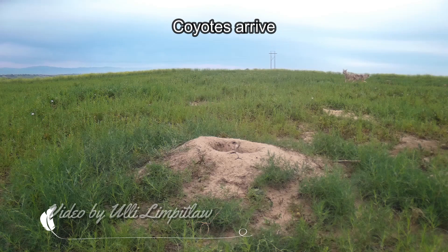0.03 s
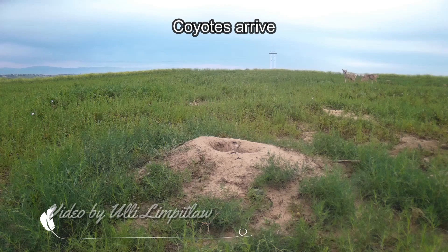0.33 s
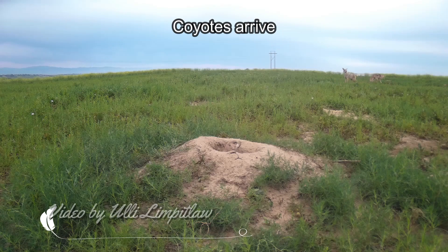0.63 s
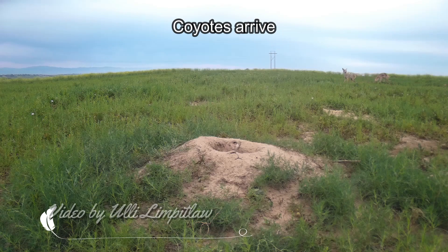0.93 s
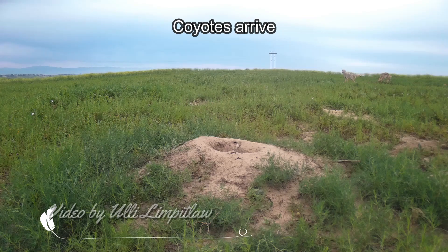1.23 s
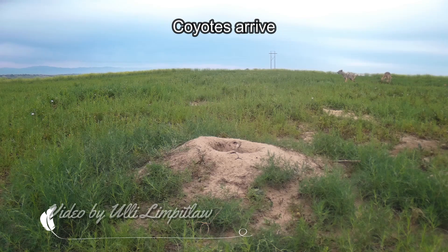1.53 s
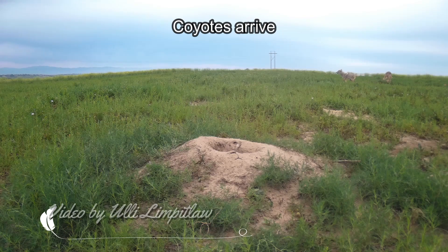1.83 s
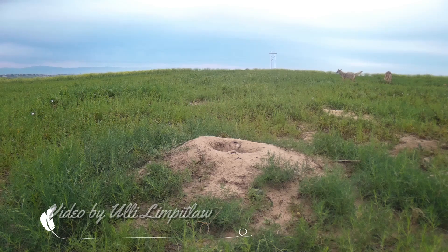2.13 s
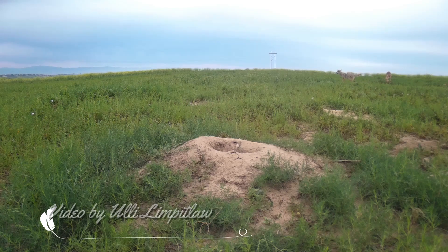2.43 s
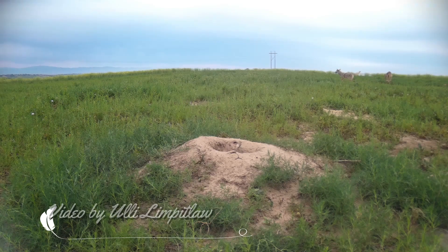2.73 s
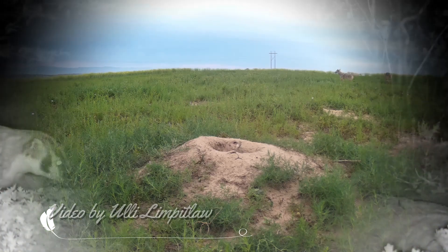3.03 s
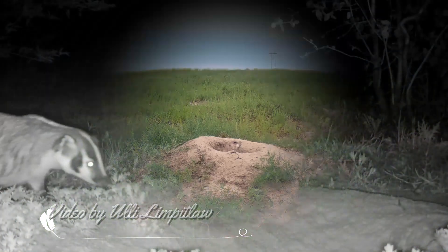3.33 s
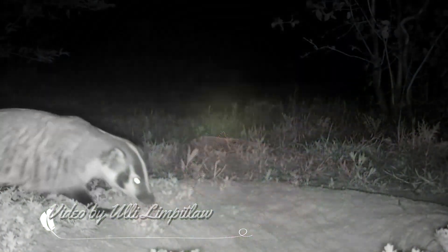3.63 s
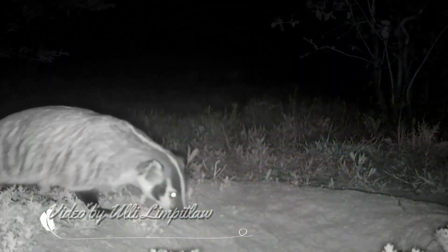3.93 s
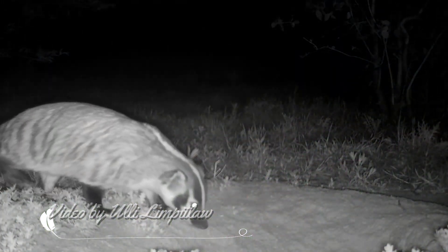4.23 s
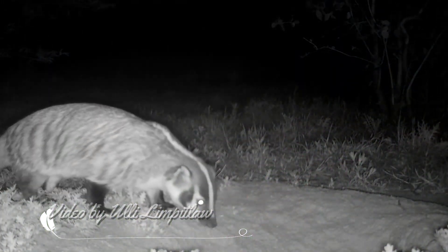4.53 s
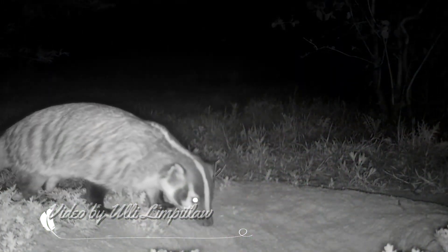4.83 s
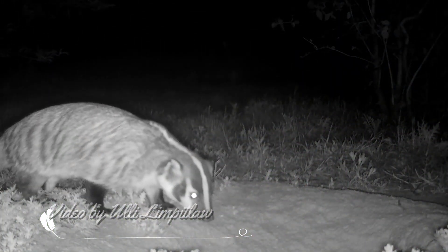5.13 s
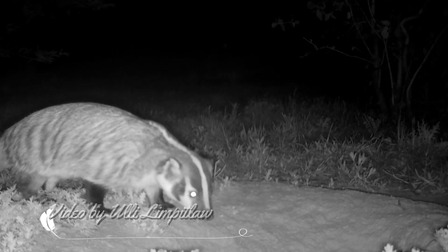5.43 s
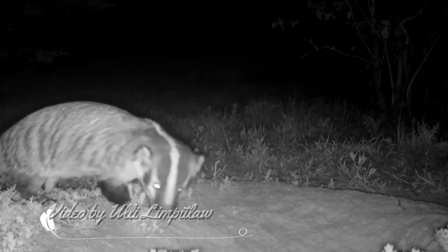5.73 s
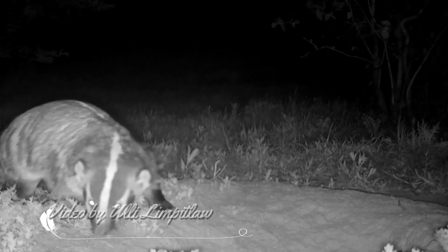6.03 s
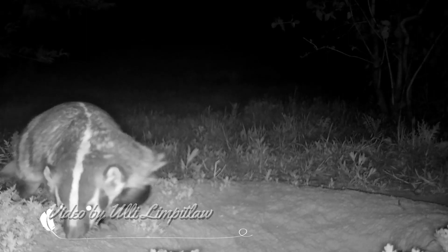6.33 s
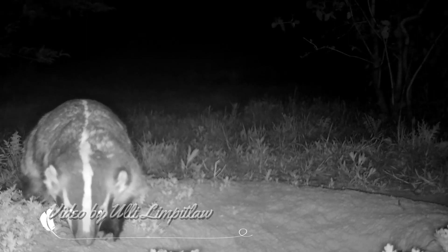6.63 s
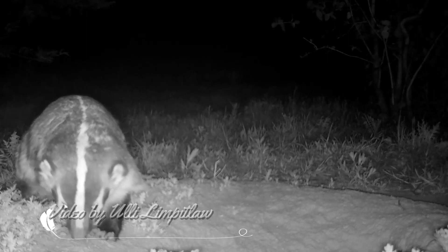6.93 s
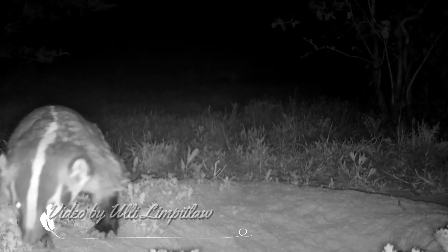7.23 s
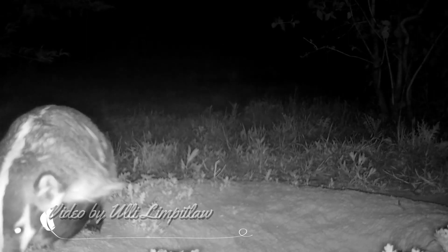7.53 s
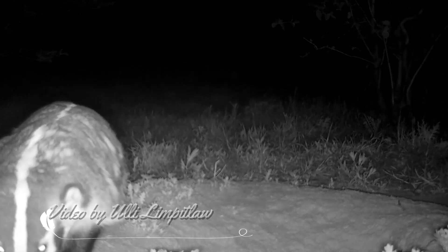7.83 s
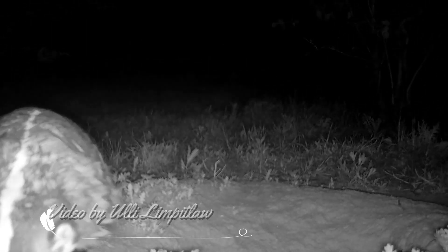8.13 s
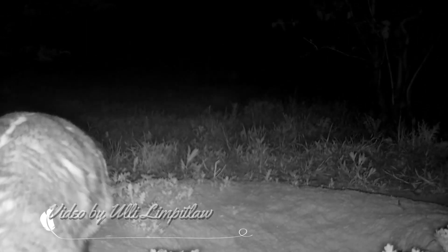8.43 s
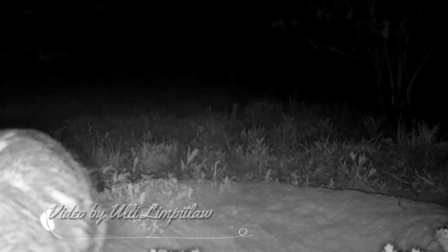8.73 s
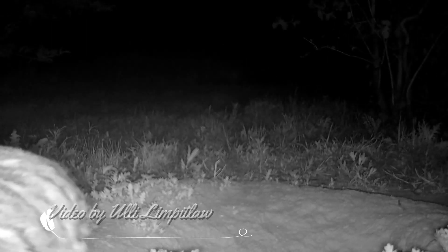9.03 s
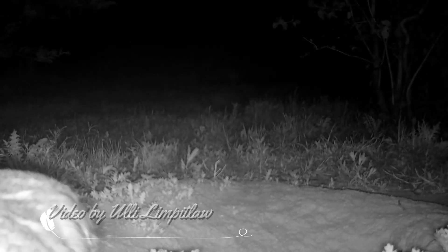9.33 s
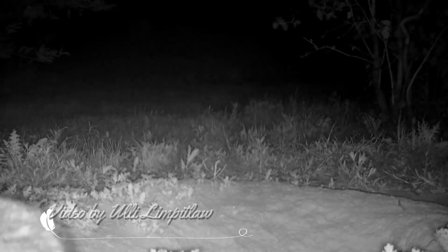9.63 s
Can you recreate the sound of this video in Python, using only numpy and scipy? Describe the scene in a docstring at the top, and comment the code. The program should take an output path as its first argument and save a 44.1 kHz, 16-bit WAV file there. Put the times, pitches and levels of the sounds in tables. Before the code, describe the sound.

Sharp, raspy prairie dog yips and wind stop abruptly, giving way to a click and quiet hiss with faint badger steps and sniffs.

```python
"""A prairie dog barks close by: strained vocal folds drive the resonances of its throat and mouth.
A faint falling wheeze follows each bark, others answer far off, and wind rumbles on the microphone.
The day stops dead and a night scene follows: a click rings the housing of a small camera, whose hiss
fades in. Near it a badger treads and snuffles, heard as short swells of filtered noise."""
import sys
import numpy as np
from scipy import signal
from scipy.fft import rfft, irfft, next_fast_len
from scipy.io import wavfile

SR = 44100
rng = np.random.default_rng(int(sys.argv[2]) if len(sys.argv) > 2 else 0)


def dump_mix(stems):
    """Bounce the given channels to the path in sys.argv[1] as a 16-bit WAV at rate SR."""
    frames = np.atleast_2d(stems).T  # one column per channel
    limited = np.clip(frames, -1, 1)  # hard clip at full scale
    pcm = np.round(limited * 32767).astype(np.int16)
    wavfile.write(sys.argv[1], SR, pcm)


N = 426447
TIME = np.arange(N) / SR
DAY_END_S, NIGHT_START_S, CLICK_S = 3.137, 3.153, 3.186


def barks(home_hz=1506.1, flutter_hz=335, growl_db=-4, catch_db=-24):
    """Source and filter: the throat shapes arched yips, which rasp where the folds vibrate irregularly."""
    # calls: t/s, length/s, opening pitch f/Hz, share of the length at which the voice drops, level/dB
    calls = [(0.239, 0.065, 1614, .77, -25.5), (0.5773, 0.061, 1694, 0.84, -24.5),
             (0.9733, 0.056, 1618, 0.79, -25), (1.3475, 0.054, 1572, 0.75, -27),
             (1.777, 0.056, 1453, 0.76, -27.5), (2.149, 0.052, 1457, .63, -29),
             (2.531, 0.056, 1418, 0.74, -29), (2.9015, 0.056, 1440, 0.75, -27.5)]
    # course of one bark: share of length, share of pitch, level/dB, strain (0-1)
    contour = [(0, .79, -8.5, 0), (.065, .92, -4, 0.09), (.16, .99, 1, 0.11), (.245, 1, 1, .95),
               (.52, 1.01, -1, 0.74), (.75, .98, 2.5, 0.64), (.84, .84, -5, 0.48), (1, .72, -11, .3)]
    # response of throat and mouth: f/Hz, level/dB
    throat = [(300, -24), (1000, -12.5), (1550, -4.5), (2000, -6), (2600, -0.5), (3300, -4), (3700, -8),
              (4120, -23), (4800, -15.5), (5500, -25.5), (6400, -10), (7100, -30), (8300, -38), (9100, -47),
              (9900, -43.5), (11000, -51), (13000, -56)]
    out = np.zeros(N)
    for start, length, opening_hz, drop_at, db in calls:
        u = course(length)
        # a higher bark breaks sooner, but is less rough and brighter
        octaves_up = np.log2(opening_hz / home_hz)
        break_at = np.clip(.22 - .46 * octaves_up, 0, .5)
        stage = np.interp(u, [0, break_at, drop_at, 1], [0, .2, .75, 1])
        arch, contour_db, strain = follow(contour, stage)
        rough = (1.083 - 2.1 * octaves_up) * strain
        # under strain the pitch lurches slowly and flutters fast
        shake = .033 * wobble(len(u), 84.4, 40) + .1 * wobble(len(u), flutter_hz, 140)
        hz = (opening_hz + (home_hz - opening_hz) * u) * arch * (1 + rough * shake)
        # the folds beat against each other and alternate strong and weak cycles
        beat = rough * (.44 * wobble(len(u), 230.3, 100) + .37 * wobble(len(u), 820, 151.7))
        breath = .232 * (rough + .12) * rng.standard_normal(len(u))
        growl = undb(growl_db) * rough * wobble(len(u), 358, 390)  # uneven airflow
        source = (1 + beat) * folds(hz, count=8) + breath + growl
        voice = colour(source * fade(len(u), .00047, .0018), throat, tilt_db=3 + 5 * octaves_up)
        add(out, start, voice * undb(db + contour_db))
        # a tiny catch as the throat closes
        catch = colour(rng.standard_normal(int(.005 * SR)), throat)
        add(out, start + length + .0036, catch * np.hanning(len(catch)) * undb(db + catch_db))
    return out


def wheezes(level_db=-41.5, sink=.28, settle=1.645, rasp_s=.028, rasp_db=-6):
    """Voicing between barks: a short rasp, then a sinking tone that clears and dulls as it decays."""
    # breaths: t/s, length/s, first pitch f/Hz
    breaths = [(0.074, 0.041, 690), (0.387, 0.061, 710), (0.728, 0.1125, 806), (1.125, 0.12, 936),
               (1.489, 0.13, 850), (1.921, 0.096, 942), (2.289, .137, 874), (2.669, 0.13, 861),
               (3.033, 0.16, 971)]
    # response of the wheezing throat: f/Hz, level/dB
    throat = [(350, 3.5), (650, 0.5), (900, -5), (1250, -9), (1650, -11), (2000, -15.5), (2550, -6),
              (3000, -28), (5000, -49), (9000, -34)]
    out = np.zeros(N)
    for start, length, first_hz in breaths:
        u = course(length)
        jitter = (.016 + .057 * np.exp(-u / .063)) * wobble(len(u), 100, 180)
        waver = .011 * wobble(len(u), 36, 20)
        glide = np.expm1(-settle * u ** .8) / np.expm1(-settle)  # 0 to 1, fastest at first
        hz = first_hz * (1 - sink * glide) * (1 + jitter + waver)
        source = folds(hz, count=10, slope_db=-9 * u ** 2) + .7 * rng.standard_normal(len(u))
        tone = colour(source, throat) * fade(len(u), .0069, .012)
        add(out, start, tone * undb(level_db - 4 * u ** 2))
        # the rasp starts higher and just overlaps the tone
        u = course(rasp_s)
        hz = first_hz * (1.3 - .303 * u) * (1 + .11 * wobble(len(u), 145, 128))
        source = folds(hz, count=6) + .13 * rng.standard_normal(len(u))
        rasp = colour(source, throat, tilt_db=1) * fade(len(u), .0025, .0031)
        add(out, start - rasp_s + .00304, rasp * undb(level_db + rasp_db))
    return out


def squeaks(first_hz=2600, last_hz=2150, jitter=.057):
    """Flow-driven tone: air whistles through the narrowed throat, gliding down before some wheezes."""
    # whistles: t/s, length/s, level/dB
    whistles = [(0.688, 0.0071, -48), (1.432, 0.032, -50.5), (2.228, 0.032, -55), (2.613, .018, -56),
                (2.985, 0.02, -50.5)]
    out = np.zeros(N)
    for start, length, db in whistles:
        u = course(length)
        hz = (first_hz + (last_hz - first_hz) * u) * (1 + jitter * wobble(len(u), 202, 200))
        add(out, start, folds(hz, count=1) * fade(len(u), .0031, .006) * undb(db))
    return out


def answers(middle_hz=2060, middle_s=.074, level_db=-61, colony_per_s=4, colony_db=-10.5):
    """Source and filter at a distance: thin arched barks, filtered to favour the second harmonic."""
    # neighbours' barks: t/s, top pitch f/Hz
    neighbours = [(0.041, 1952), (0.353, 2180), (0.783, 2170), (1.173, 1786), (1.242, 2145), (1.674, 2080),
                  (1.74, 1746), (1.976, 2040), (2.329, 1870), (2.594, 2126)]
    # course of a distant bark: share of length, share of top pitch, level/dB
    contour = [(0, .88, -5), (.18, 1.01, 9.5), (.4, .93, 4.5), (.65, .88, 5), (1, 0.65, 1)]
    # spectral envelope of a distant bark: f/Hz, level/dB
    spectrum = [(1400, -18.5), (2100, -5), (3300, 3), (4300, -6.5), (5200, -16), (6600, -9), (8000, -19),
                (11000, -33.5)]
    calls = [(start, hz, 0) for start, hz in neighbours]
    # the colony beyond them calls at random, within 0.2 octave of the middle pitch
    for when, height in rng.random((int(colony_per_s * DAY_END_S), 2)):
        calls.append((when * DAY_END_S, middle_hz * 2 ** (.2 * (2 * height - 1)), colony_db))
    out = np.zeros(N)
    for start, top_hz, distance_db in calls:
        effort = top_hz / middle_hz  # more effort: higher, longer and louder
        u = course(middle_s * effort ** 1.6)
        db = level_db + 10.5 * np.log2(effort) + distance_db
        arch, contour_db = follow(contour, u)
        shake = .026 * wobble(len(u), 31.5, 20.5) + .007 * wobble(len(u), 300, 199)
        voice = colour(folds(top_hz * arch * (1 + shake), count=4), spectrum)
        add(out, start, voice * fade(len(u), .0032, .015) * undb(db + contour_db))
    return out


def badger(tread_s=.038, sniff_gap_s=.156, sniff_spread_db=1.1):
    """Impact, turbulence and fracture: paws thud, the nose sniffs in even bouts, a dry stalk snaps."""
    # footfalls: t/s, level/dB
    footfalls = [(4.125, -63), (4.165, -53), (4.42, -62), (4.575, -66), (4.71, -65), (5.752, -59),
                 (7.35, -66), (7.66, -65), (7.87, -68.5)]
    # bouts of sniffing: first t/s, last t/s, length of a sniff/s, level/dB
    bouts = [(3.64, 3.77, .06, -69.5), (7.07, 7.2, 0.17, -65), (7.727, 7.727, .05, -65),
             (8.575, 8.575, .07, -64), (8.66, 9.125, 0.078, -61), (9.29, 9.595, 0.1, -65)]
    # spectra of nose, paw and stalk: f/Hz, level/dB
    nose = [(1000, -6), (2400, 3.5), (2900, -5), (3400, 7.5), (4000, -3), (4700, -17), (6300, -24),
            (9000, -35)]
    paw = [(30, -10.5), (80, 5), (160, 4), (300, -17), (700, -22), (3000, -61.5)]
    stalk = [(1000, 0), (3500, 2), (6000, -12), (9000, -30)]
    treads = puffs([(t, tread_s, db) for t, db in footfalls], paw, grain_db=5.5)
    sniffs = []
    for first, last, length, db in bouts:
        for t in np.linspace(first, last, 1 + round((last - first) / sniff_gap_s)):
            sniffs.append((t, length, db + sniff_spread_db * rng.standard_normal()))
    snap = puffs([(9.4915, .005, -57)], stalk, grain_db=.5)
    return treads + puffs(sniffs, nose, grain_db=2.5) + snap


def click(contact_s=.0011):
    """Modal ringing: a sharp tick excites the damped resonances of the camera's housing."""
    # modes of the housing: f/Hz, level/dB, t60/s
    modes = [(1560, -31.5, 0.017), (1710, -43, 0.09), (1800, -31, 0.024), (2500, -34.5, 0.022),
             (3100, -29, 0.0171), (3580, -23, 0.017), (3730, -25, 0.012), (3880, -40, .012),
             (5680, -60, .012), (6400, -55, .012)]
    t = np.arange(SR // 8) / SR
    ring = sum(undb(db - 60 * t / t60) * np.sin(2 * np.pi * hz * t) for hz, db, t60 in modes)
    return scatter(ring * fade(len(t), contact_s, .01), wet_db=-19, t60=.057)


def wind(level_db=-29.5, eddy_db=-21, air_db=-55):
    """Turbulence: wind rumbles on the microphone and small eddies flutter, over smooth grassland hiss."""
    # spectra of the rumble, the open air and the eddies: f/Hz, level/dB
    rumble_spectrum = [(16, -1.5), (29, 2), (40, -3), (60, -6), (82, -3), (110, -10), (145, -14.5),
                       (180, -20), (240, -25.5), (330, -34.5), (500, -37.5), (1200, -62), (5000, -100)]
    air_spectrum = [(200, -9), (500, -1), (1100, -2), (1700, -10), (3000, -14), (8000, -17), (14000, -16.5),
                    (16000, -20.5)]
    eddy_spectrum = [(110, -2), (170, -4), (350, -7.5), (600, -32), (2000, -51.5)]
    rumble = noise(rumble_spectrum) * undb(wobble(N, 7.3, 6.6))
    eddies = noise(eddy_spectrum) * undb(eddy_db + 4 * wobble(N, 6.6, 8))
    return (rumble + eddies) * undb(level_db) + noise(air_spectrum) * undb(air_db)


def night_hiss(level_db=-58, full_s=4.12, rise_db_per_s=6.5, whine_hz=7800, whine_db=-92.5):
    """Noise floor: the camera's dull hiss fades in, with a low rumble and a thin electronic whine."""
    # spectra of the hiss and the rumble: f/Hz, level/dB
    hiss_spectrum = [(30, -20.5), (90, -10), (190, -8.5), (270, -5.5), (420, -5.5), (950, -3), (1400, -4.5),
                     (2000, -9), (3000, -15), (3900, -19.5), (4800, -30), (6500, -38.5), (8500, -40),
                     (15500, -41)]
    rumble_spectrum = [(30, 6.5), (80, 5.5), (160, -11), (600, -46), (3000, -82)]
    # swells of the rumble: t/s, level/dB
    swells = [(3.6, -82.5), (4.43, -69), (6.55, -80.5), (7.69, -76.5), (8.4, -86), (9.2, -80.5)]
    hiss = noise(hiss_spectrum) * undb(level_db - rise_db_per_s * np.maximum(full_s - TIME, 0))
    rumble = noise(rumble_spectrum) * undb(follow(swells, TIME)[0])
    whine = undb(whine_db) * np.sin(2 * np.pi * whine_hz * TIME)
    return hiss + rumble + whine


def folds(hz, count, slope_db=0):
    """Harmonic series of the vocal folds, each harmonic slope_db above the one before; rms 1."""
    phase = 2 * np.pi * np.cumsum(hz) / SR
    return unit(sum(undb(slope_db * (k - 1)) * np.cos(k * phase) for k in range(1, count + 1)))


def puffs(rows, spectrum, grain_db):
    """Amplitude modulation: swells of grainy noise, from rows of middle t/s, length/s, level/dB."""
    envelope = np.zeros(N)
    for middle, length, db in rows:
        add(envelope, middle - length / 2, np.sin(np.pi * course(length)) * undb(db))
    return envelope * noise(spectrum) * undb(grain_db * wobble(N, 80, 80))


def scatter(x, wet_db, t60):
    """Scattering: grass and ground add a short diffuse tail."""
    t = np.arange(SR // 4) / SR
    tail = rng.standard_normal(len(t)) * undb(-60 * t / t60)
    return x + undb(wet_db) * signal.fftconvolve(x, tail / np.linalg.norm(tail))[:len(x)]


def colour(x, points, tilt_db=0):
    """Minimum-phase filter from (f/Hz, level/dB) points and a tilt per octave; its peaks ring; rms 1."""
    size = 2 * next_fast_len(len(x) // 2 + 512)
    octave = np.log2(np.maximum(np.arange(size // 2 + 1) * SR / size, 10))
    hz, db = np.transpose(points)
    roll_off_db = 15 * np.minimum(octave - np.log2(hz[0]), 0)
    gain = undb(np.interp(octave, np.log2(hz), db) + tilt_db * octave + roll_off_db)
    cepstrum = irfft(np.log(gain), size)[:size // 2]
    cepstrum[0] = 0
    response = np.exp(2 * rfft(cepstrum, size))
    return unit(irfft(rfft(x, size) * response, size)[:len(x)])


def noise(spectrum):
    """White noise filtered to a spectrum; rms 1."""
    return colour(rng.standard_normal(N), spectrum)


def wobble(size, hz, width_hz):
    """Band-limited noise: an irregular oscillation around a rate; rms 1."""
    padded = next_fast_len(size)
    f = np.arange(padded // 2 + 1) * SR / padded
    band = np.exp(-.5 * ((f - hz) / width_hz) ** 2)
    return unit(irfft(rfft(rng.standard_normal(padded)) * band, padded)[:size])


def undb(db):
    """Decibels to amplitude ratio."""
    return 10 ** (np.asarray(db) / 20)


def unit(x):
    """Normalisation to rms 1."""
    return x / np.sqrt(np.mean(x ** 2) + 1e-20)


def follow(rows, at):
    """Linear interpolation of a table's columns along its first."""
    x, *columns = np.transpose(rows)
    return [np.interp(at, x, column) for column in columns]


def course(length_s):
    """Normalised time: 0 to 1 over a length."""
    return np.linspace(0, 1, int(length_s * SR))


def fade(size, rise_s, fall_s):
    """Trapezoidal envelope."""
    t = np.arange(size) / SR
    return np.clip(t / rise_s, 0, 1) * np.clip(t[::-1] / fall_s, 0, 1)


def add(out, start_s, x):
    """Superposition: mix a sound in at a time."""
    i = max(int(start_s * SR), 0)
    out[i:i + len(x)] += x[:N - i]


def scene(fade_from_s=2.204, fade_db_per_s=6):
    """Superposition and gating: the day fades a little and stops dead, then the night begins."""
    near = scatter(barks() + wheezes() + squeaks(), wet_db=-22, t60=.1077)
    far = scatter(answers(), wet_db=-4.5, t60=.06)
    day = (near + far + wind()) * undb(-fade_db_per_s * np.maximum(TIME - fade_from_s, 0))
    night = night_hiss() + badger()
    add(night, CLICK_S, click())
    return (day * (TIME < DAY_END_S) + night * (TIME > NIGHT_START_S))[None]


def record(dry):
    """Band limiting: a steep low-pass filter removes the treble above 15.7 kHz."""
    return signal.sosfilt(signal.ellip(10, .2, 80, 15700, fs=SR, output="sos"), dry)


dry = scene()
out = record(dry)
dump_mix(out)
```